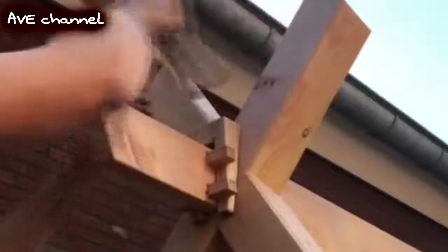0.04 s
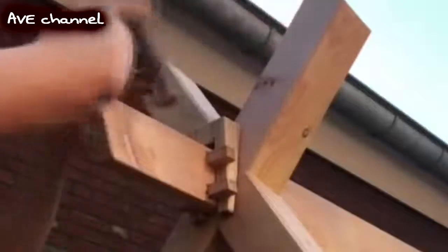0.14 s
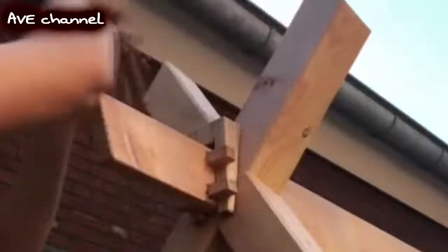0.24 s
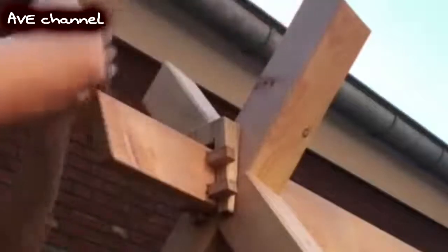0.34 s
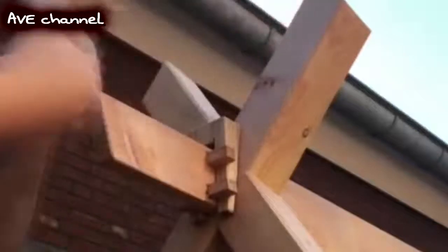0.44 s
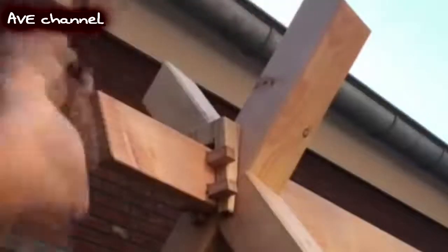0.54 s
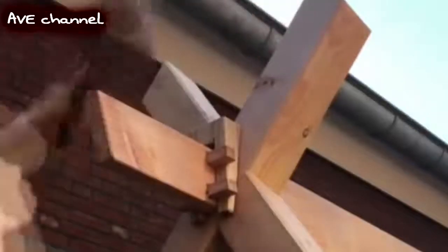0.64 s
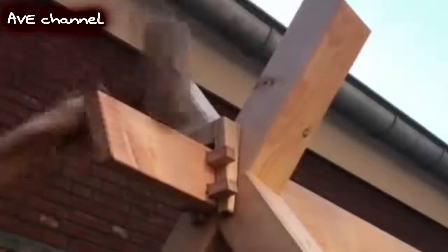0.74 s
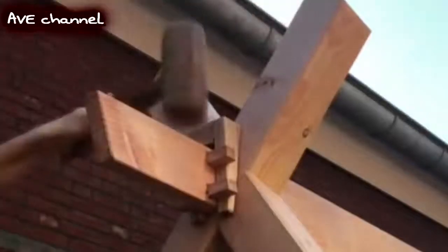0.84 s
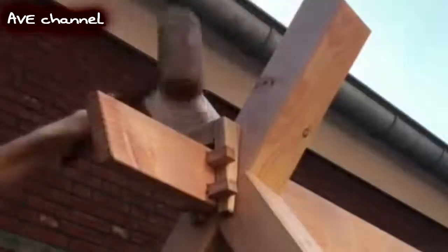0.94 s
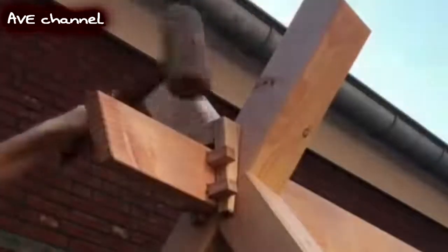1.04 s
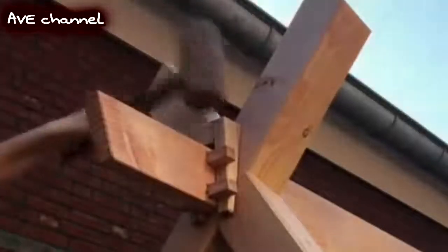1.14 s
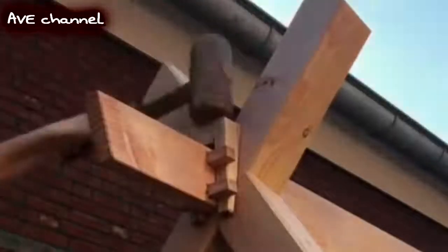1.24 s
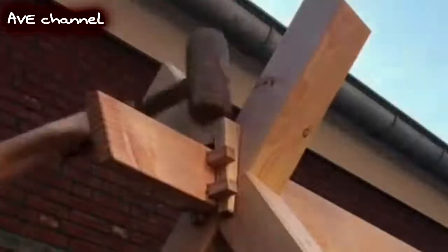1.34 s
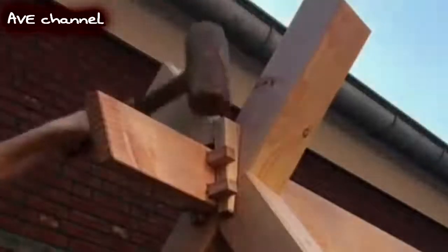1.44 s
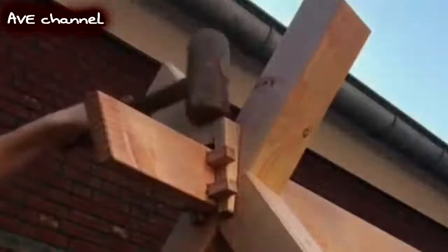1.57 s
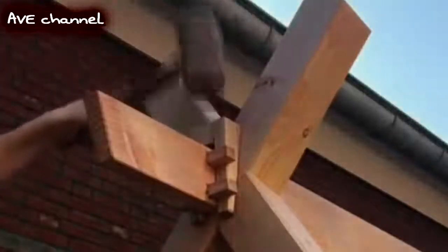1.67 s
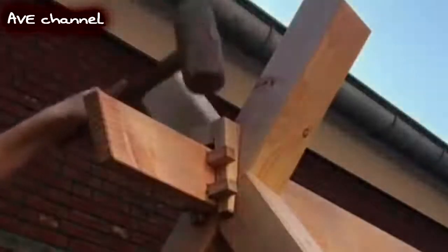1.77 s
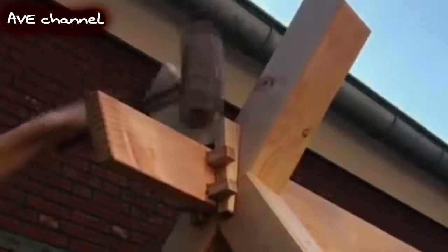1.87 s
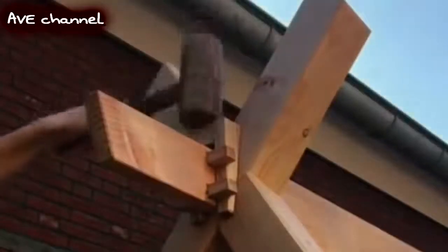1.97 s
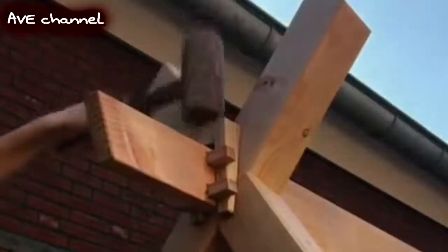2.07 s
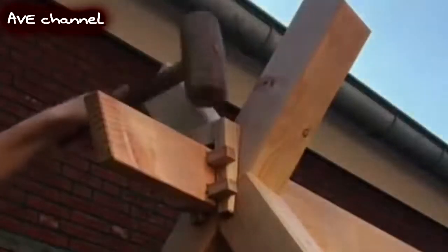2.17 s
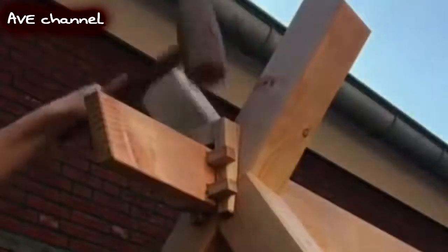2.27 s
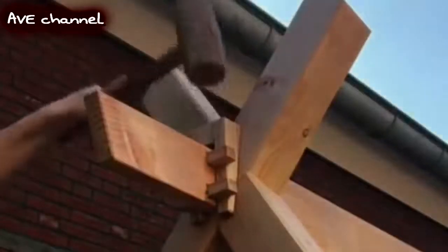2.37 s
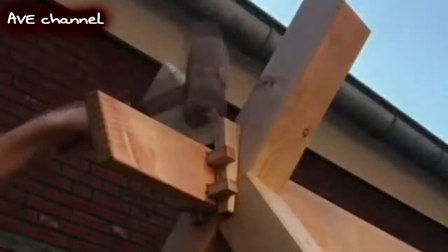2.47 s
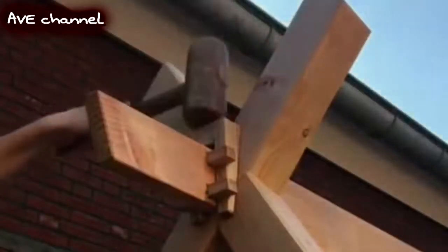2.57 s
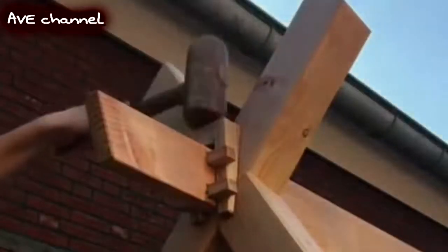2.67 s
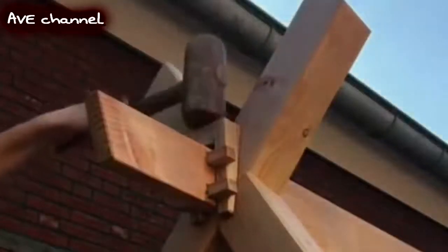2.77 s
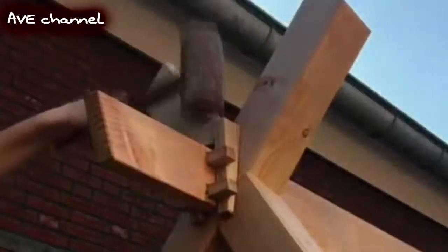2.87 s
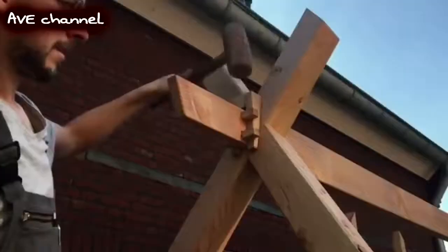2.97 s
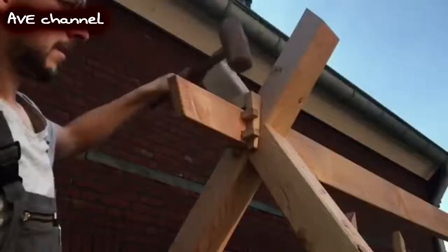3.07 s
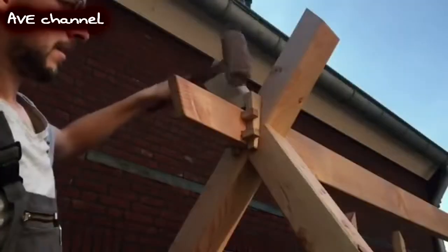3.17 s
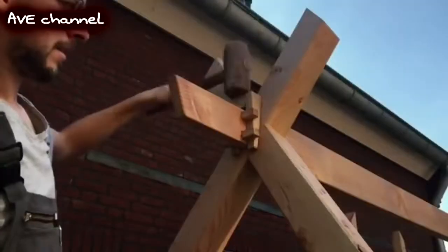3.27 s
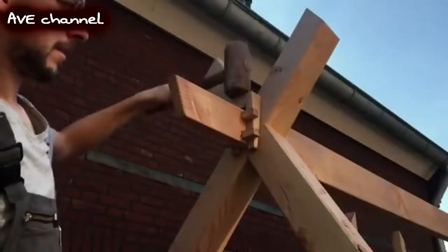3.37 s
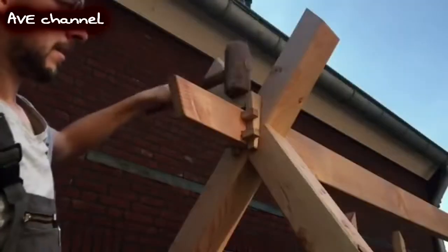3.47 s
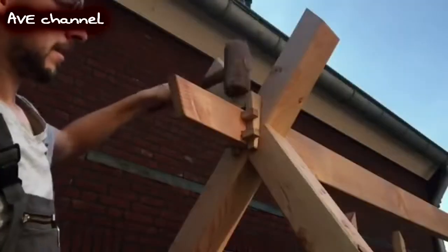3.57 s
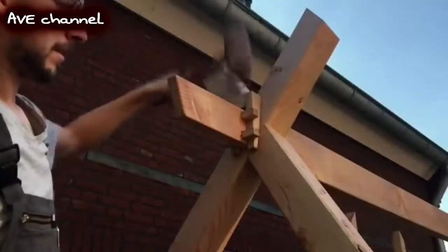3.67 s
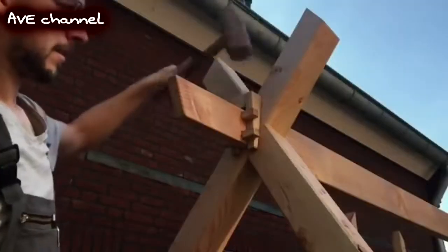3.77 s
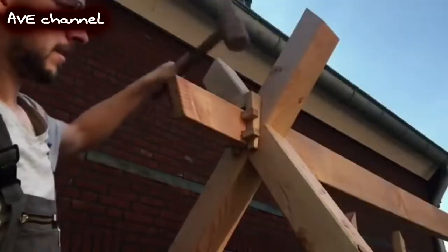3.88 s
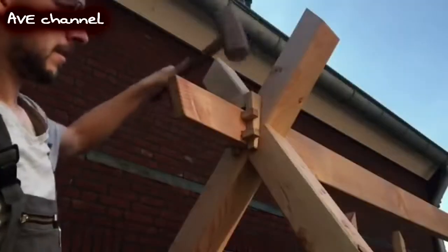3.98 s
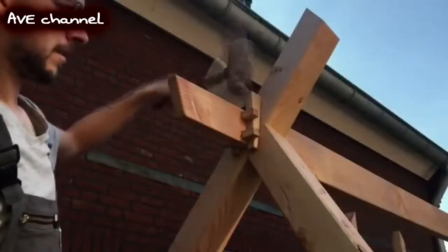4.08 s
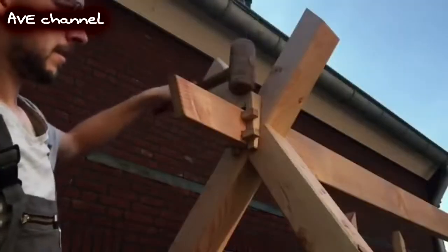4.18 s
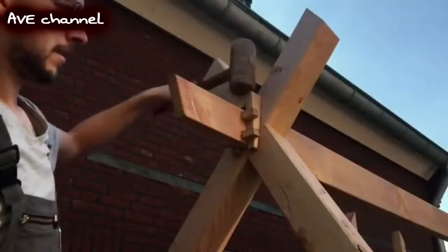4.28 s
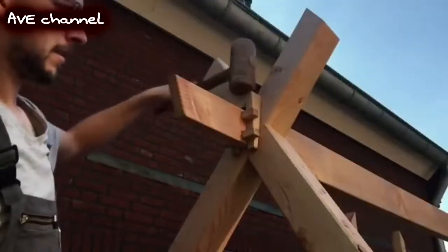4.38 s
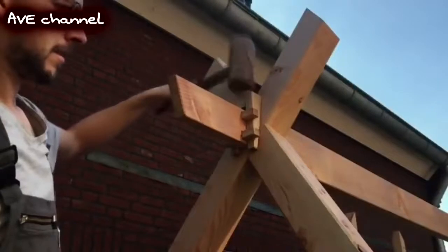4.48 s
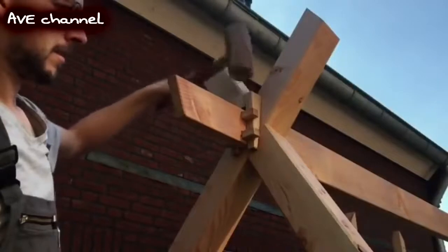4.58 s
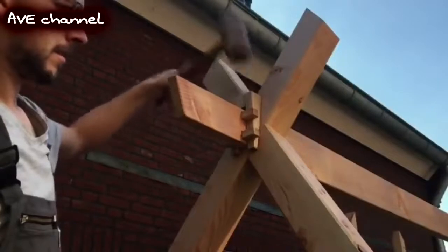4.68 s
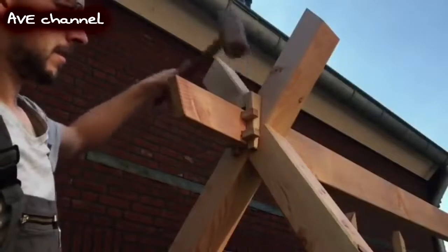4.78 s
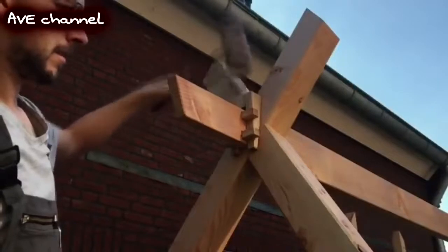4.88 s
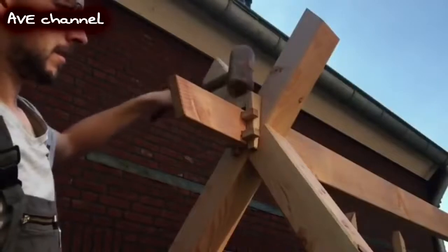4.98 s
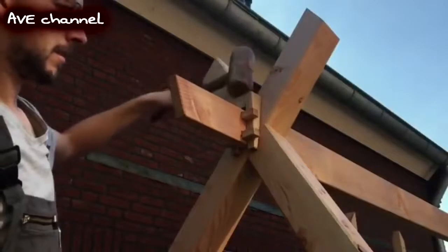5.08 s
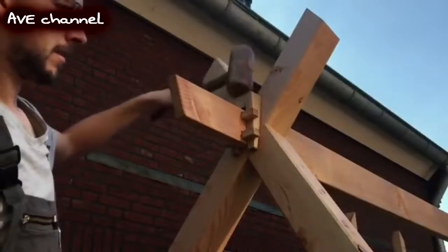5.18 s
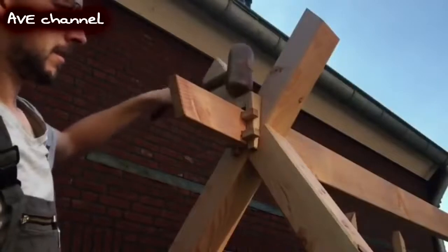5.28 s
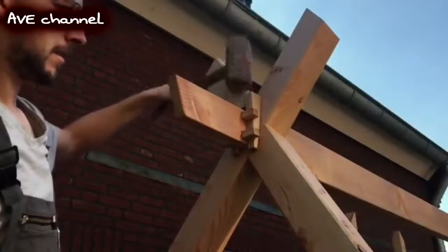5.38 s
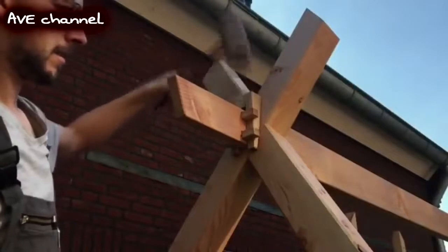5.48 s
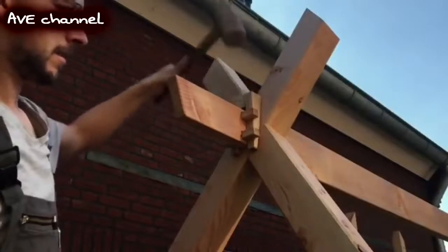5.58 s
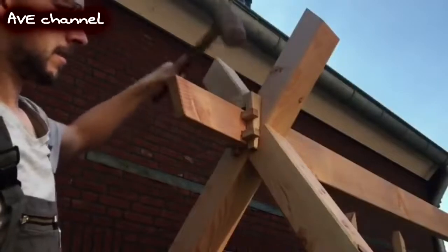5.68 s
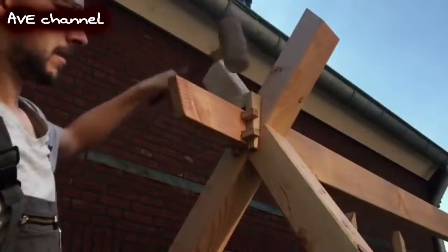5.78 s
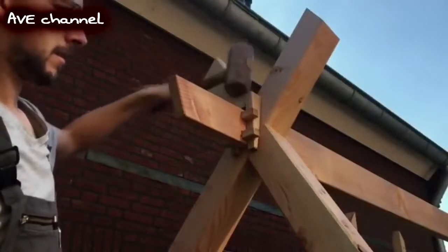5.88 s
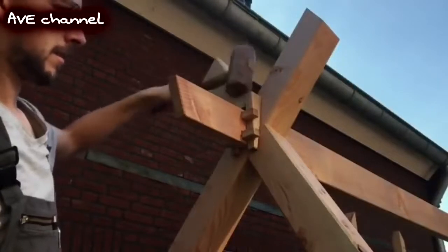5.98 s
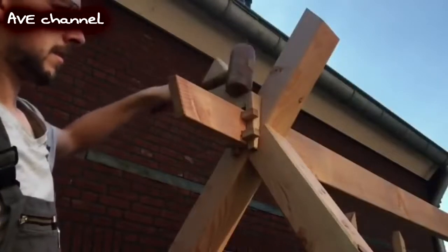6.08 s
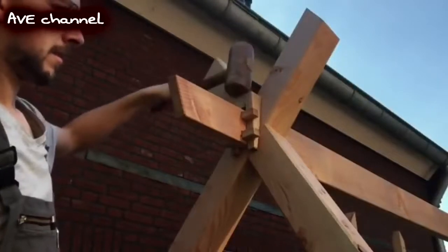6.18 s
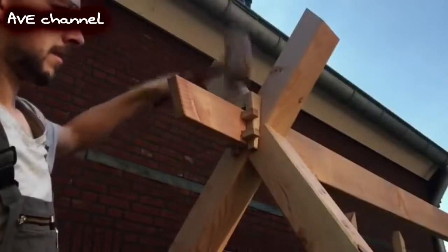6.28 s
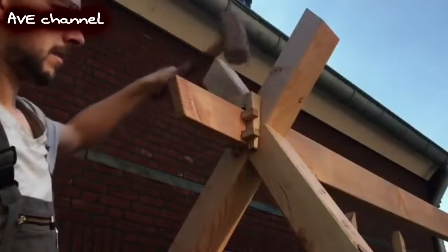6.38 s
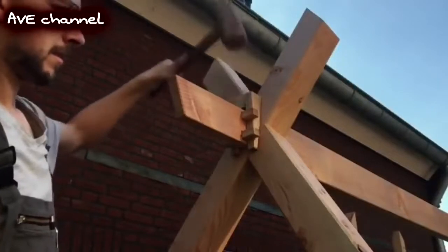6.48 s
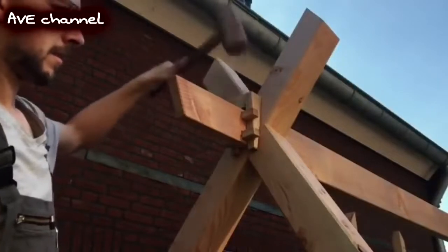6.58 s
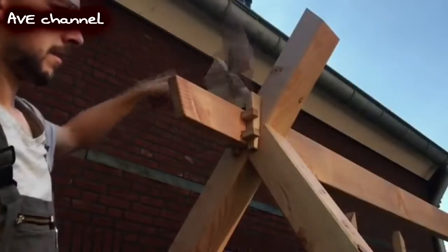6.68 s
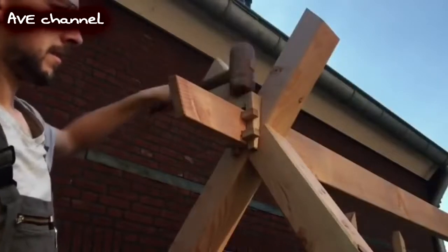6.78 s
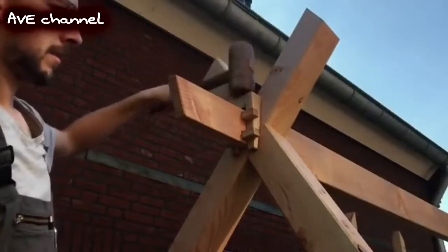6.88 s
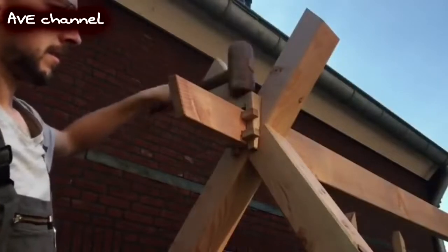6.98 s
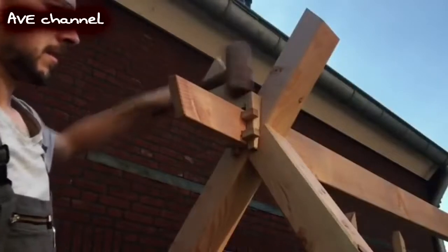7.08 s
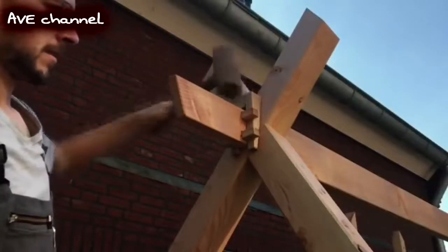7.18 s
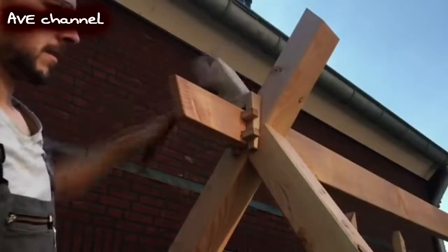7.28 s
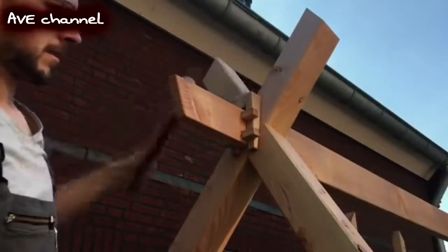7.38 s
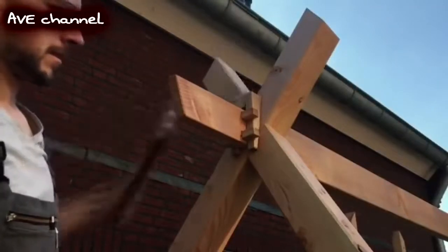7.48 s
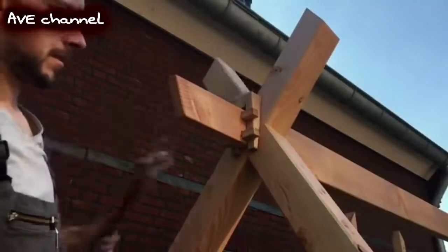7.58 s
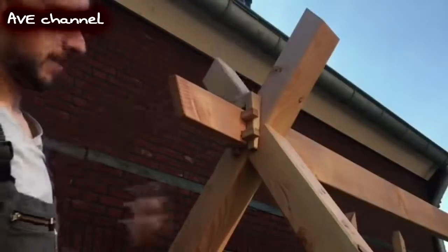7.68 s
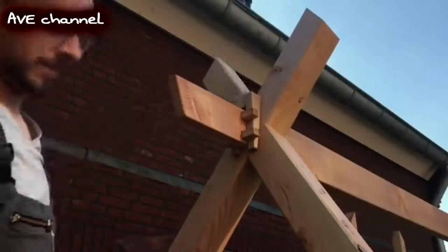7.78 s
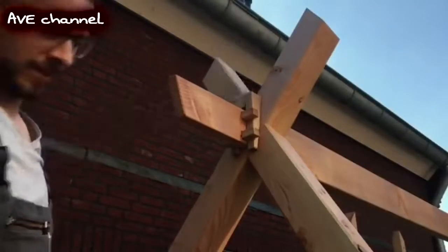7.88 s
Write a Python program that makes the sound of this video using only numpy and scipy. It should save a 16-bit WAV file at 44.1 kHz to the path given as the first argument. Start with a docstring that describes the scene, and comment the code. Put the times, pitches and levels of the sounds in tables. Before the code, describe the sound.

Close, loud wood-on-wood knocks from a heavy mallet seating a brace in a frame. First quiet skin rustles and one dull tap, then four blows in quick uneven succession and five slower ones about every 0.9 seconds, most with a quick little bounce. The peaks are slightly overloaded, with a short yard reverberation. A faint engine hum rises in pitch beneath.

```python
"""A heavy mallet drives a brace into the joint of a timber frame, in a yard beside a brick house.
One soft placing tap, then nine hard blows: as play is used up, the frame booms more and the mallet rebounds.
Wood is decaying modes over shaped noise bursts; a hand brushes it first, and wall echoes and a tail follow.
Behind, a vehicle hums on a climbing pitch, drones briefly, and road noise swells over still air.
"""
import sys
import numpy as np
from scipy import signal
from scipy.fft import rfft, irfft
from scipy.io import wavfile
from scipy.ndimage import uniform_filter1d

SR = 44100
rng = np.random.default_rng(int(sys.argv[2]) if len(sys.argv) > 2 else 0)


def to_wav(s):
    """Save 16-bit WAV."""
    ch = np.atleast_2d(s).T  # columns
    pcm = np.round(np.clip(ch, -1, 1) * 32767)  # PCM
    wavfile.write(sys.argv[1], SR, pcm.astype(np.int16))


N = 349798
AGE = np.arange(SR // 2) / SR  # seconds since a contact
TIME = np.arange(N) / SR
JOINT_LAG_S = 0.00453  # the brace is struck first and knocks in its joint a moment later
BALANCE_DB = 0.77  # left up, right down

PLAY_KEPT = 0.78  # share of the joint's play left after each blow
FRAME_DB, FRAME_LOOSE_DB = -17.5, -18.5  # level without play; change at full play
JOINT_DB, JOINT_LOOSE_DB = -14, -24  # likewise
BRACE_DB, CRACK_DB, EDGE_DB = -16, -20, -41.5  # before each blow's own offsets

# hard mallet blows: start_s, level_db, extra_crack_db, extra_edge_db, contact_pitch_hz
MALLET_BLOWS = [(1.3439, -0.5, -0.5, 0, 1210), (1.6703, -1.5, -8, -7, 1700), (2.0171, 1, -0.5, -6, 1400),
                (2.6214, 1, -4, 0.5, 1653), (3.3619, -1, 2, -1.5, 1590), (4.2261, 0, 0, 1.5, 2280),
                (5.076, 0.5, -1, 1, 1593), (5.9784, 0.5, -1, 1, 1700), (6.851, 1.5, -0.5, 0, 1630)]


def blows():
    """Each blow takes up play: a tighter brace lengthens the grain contact and lets the frame boom more."""
    out = np.zeros(N)
    for k, (start_s, level_db, crack_db, edge_db, contact_pitch_hz) in enumerate(MALLET_BLOWS):
        play = PLAY_KEPT ** k
        rattle_db = -7 + 14 * play
        boom = from_db(FRAME_DB + FRAME_LOOSE_DB * play) * frame_boom(rattle_db)
        knock = from_db(JOINT_DB + JOINT_LOOSE_DB * play) * joint_knock(rattle_db)
        clack = brace_clack(contact_pitch_hz, tone_db=-4 + 5 * play, dense_db=7.5 - 2.6 * play, contact_s=0.003)
        grain = crack(contact_s=0.0066 * 0.35 ** play, ring_db=2.5 - 15 * play, ring_t60_s=0.063)
        edge = bright_edge(fizz_db=-1 - 7.6 * play)
        struck = boom + from_db(BRACE_DB) * clack
        struck += from_db(CRACK_DB + crack_db) * grain
        struck += from_db(EDGE_DB + edge_db) * edge
        add(out, start_s, from_db(level_db) * struck)
        add(out, start_s + JOINT_LAG_S, from_db(level_db) * knock)
    return out


# clear modes of the frame: pitch_hz, level_db, t60_s
FRAME_MODES = [(255, -17, .12), (311, -10, .24), (322, -3, .075), (395, -9, .07), (434, -2, .08),
               (462, -7, .08), (508, 0, .11)]
# dense modes of the frame: freq_hz, level_db_per_hz
THUD_SPECTRUM = [(40, -25.5), (80, -9.5), (120, -6), (165, -6), (200, -18.5), (240, -5), (330, -1.5),
                 (520, -4.5), (700, -12.5), (1200, -44.5)]


def frame_boom(dense_db):
    """Low bending of posts and beams."""
    boom = timber(FRAME_MODES, THUD_SPECTRUM, dense_db, dense_t60_s=0.14, spread_db=5.5)
    return unit_blow(boom * build_up(0.0036))


# clear modes of the seated joint: pitch_hz, level_db, t60_s
JOINT_MODES = [(578, -10, .07), (622, -9, .08), (682, -7, .07), (716, 0, .12), (745, -9, .08),
               (785, -6, .1), (832, -9, .09)]
# dense modes of the joint: freq_hz, level_db_per_hz
KNOCK_SPECTRUM = [(350, -49.5), (560, -7.5), (730, 9.5), (850, -7), (950, -15.5), (1500, -41)]


def joint_knock(dense_db):
    """The hollow note of the tight joint."""
    knock = timber(JOINT_MODES, KNOCK_SPECTRUM, dense_db, dense_t60_s=0.14, spread_db=0.5)
    return unit_blow(knock * build_up(0.0015))


# clear modes of the brace: pitch_hz, level_db, t60_s
BRACE_MODES = [(980, -10, .06), (1070, -8, .06), (1194, -2, .11), (1275, -7, .05), (1356, -1, .08),
               (1420, -6, .07), (1520, -4, .05), (1582, -1, .07), (1725, -4, .06), (1860, -7, .04),
               (1950, -6, .04)]
# dense modes of the brace: freq_hz, level_db_per_hz
CLACK_SPECTRUM = [(550, -29), (900, -5.5), (1200, 3.5), (1600, 0.5), (2000, -1), (2500, -12), (4000, -44.5)]


def brace_clack(contact_pitch_hz, tone_db, dense_db, contact_s):
    """The contact sounds a few strong cycles; the brace rings on, most in the modes near that pitch."""
    tone = unit_blow(np.sin(2 * np.pi * contact_pitch_hz * AGE) * contact(contact_s))
    # 16 dB off per octave from the contact's pitch
    modes = [(hz, db - 16 * abs(np.log2(hz / contact_pitch_hz)), t60_s) for hz, db, t60_s in BRACE_MODES]
    ring = timber(modes, CLACK_SPECTRUM, dense_db, dense_t60_s=0.089, spread_db=0.5)
    return unit_blow(from_db(tone_db) * tone + ring * build_up(0.0011))


# struck end grain: freq_hz, level_db_per_hz
CRACK_SPECTRUM = [(1400, -32), (2000, -0.5), (2350, 0.5), (2750, -0.5), (3250, -4.5), (3800, -9.5),
                  (4450, -12), (5000, -19), (8000, -30)]


def crack(contact_s, ring_db, ring_t60_s):
    """End grain cracks during the contact, rings briefly and spreads faintly through the frame."""
    grain = unit_blow(noise(CRACK_SPECTRUM, len(AGE)) * contact(contact_s))
    ring = burst(CRACK_SPECTRUM, ring_t60_s)
    spread = from_db(-5.5) * burst(CRACK_SPECTRUM, t60_s=0.31)
    return unit_blow(grain + from_db(ring_db) * (ring + spread) * build_up(0.003))


# bright overload edge and fizz: freq_hz, level_db_per_hz
EDGE_SPECTRUM = [(3000, -9), (5000, -8), (5600, 2), (7500, -5.5), (9300, -1.5), (10400, -13.5), (12000, -5),
                 (13300, -12.5), (14200, -20), (16000, -26.5)]


def bright_edge(fizz_db):
    """The bright overload edge of a blow, a noise pulse of 2.3 ms, and a short fizz."""
    edge = unit_blow(noise(EDGE_SPECTRUM, len(AGE)) * contact(0.0023))
    fizz = burst(EDGE_SPECTRUM, t60_s=0.11) * build_up(0.001)
    return unit_blow(edge + from_db(fizz_db) * fizz)


REBOUND_TICK_DB, REBOUND_CLACK_DB = -29.5, -14
REBOUND_BOOM_DB, REBOUND_KNOCK_DB = -20.5, -12

# mallet dropping back on the brace: start_s, level_db, contact_hardness_db
MALLET_REBOUNDS = [(3.407, -15, 3.5), (4.295, -13.5, 1.5), (4.333, -19.5, -2.5), (5.145, -14, -1),
                   (6.056, -14.5, -3), (6.936, -10.5, -1), (6.982, -16, -1), (7.009, -23, 3)]


def rebounds():
    """The falling head ticks and clacks on the brace, which then knocks dully in its joint."""
    out = np.zeros(N)
    for start_s, level_db, hardness_db in MALLET_REBOUNDS:
        tick = from_db(REBOUND_TICK_DB) * crack(contact_s=0.0035, ring_db=-6, ring_t60_s=0.044)
        clack = brace_clack(contact_pitch_hz=1186, tone_db=-0.5, dense_db=-0.5, contact_s=0.0026)
        hard = tick + from_db(REBOUND_CLACK_DB) * clack
        boom = from_db(REBOUND_BOOM_DB) * frame_boom(dense_db=6)
        knock = from_db(REBOUND_KNOCK_DB) * joint_knock(dense_db=-0.5)
        add(out, start_s, from_db(level_db) * (from_db(hardness_db) * hard + boom))
        add(out, start_s + JOINT_LAG_S, from_db(level_db) * knock)
    return out


# soft placing tap: freq_hz, level_db_per_hz
TAP_SPECTRUM = [(120, -28), (180, -5), (230, 2), (340, 1), (420, -1), (520, -8.5), (720, -1), (900, -21),
                (1150, -17), (2500, -30.5)]


def placing_tap(start_s, level_db):
    """The head is set down gently: a dull thud with a faint tick."""
    out = np.zeros(N)
    thud = burst(TAP_SPECTRUM, t60_s=0.065) * build_up(0.001)
    tick = from_db(-25) * crack(contact_s=0.0026, ring_db=-12, ring_t60_s=0.04)
    tick += from_db(-35.5) * bright_edge(fizz_db=-6)
    add(out, start_s, from_db(level_db) * (thud + tick))
    return out


# hand strokes over the timber: start_s, length_s, level_db
HAND_BRUSHES = [(0.274, 0.29, -76.5), (0.543, 0.24, -73)]
# skin on planed wood: freq_hz, level_db_per_hz
BRUSH_SPECTRUM = [(900, 0), (2400, -4), (4000, 2), (6000, -7), (9000, 0.5), (13500, -10)]


def brushes():
    """Skin slides on planed wood in short soft strokes as the hand takes hold."""
    out = np.zeros(N)
    for start_s, length_s, level_db in HAND_BRUSHES:
        add(out, start_s, from_db(level_db) * noise(BRUSH_SPECTRUM, len(AGE)) * contact(length_s))
    return out


def timber(modes, spectrum, dense_db, dense_t60_s, spread_db):
    """Clear modes of alternating sign, struck a little differently each time, over a bed of dense ones."""
    pitch_hz, level_db, t60_s = np.transpose(modes)[:, :, None]
    strength = from_db(level_db + spread_db * rng.standard_normal(pitch_hz.shape))
    strength[::2] *= -1
    clear = np.sum(strength * dying(t60_s) * np.sin(2 * np.pi * pitch_hz * AGE), axis=0)
    dense = from_db(dense_db) * burst(spectrum, dense_t60_s)
    return unit_blow(unit_blow(clear) + dense)


def burst(spectrum, t60_s):
    """Many close modes, heard as a dying noise."""
    return unit_blow(noise(spectrum, len(AGE)) * dying(t60_s))


def contact(length_s):
    """The force swells and fades while two surfaces touch."""
    return np.sin(np.pi * np.minimum(AGE / length_s, 1)) ** 0.7


def build_up(time_constant_s):
    """Sound takes time to spread: exponential onset."""
    return 1 - np.exp(-AGE / time_constant_s)


def dying(t60_s):
    """Exponential decay after a contact, 60 dB per t60."""
    return from_db(-60 * AGE / t60_s)


# first scatter: freq_hz, level_db_per_hz
YARD_SPECTRUM = [(60, -13), (200, -4), (320, 4), (750, 1.5), (1200, 3), (2000, -8), (3000, -16.5),
                 (4500, -27)]
# duller late tail: freq_hz, level_db_per_hz
LATE_SPECTRUM = [(100, -6), (320, 6.5), (750, 0), (1300, -6), (2200, -12.5), (3200, -23.5)]
# walls and eaves: delay_s, level_db
WALL_ECHOES = [(.0063, -29), (.013, -20), (0.051, -29)]


def yard(x, tail_db, t60_s, late_db, late_t60_s):
    """Echoes from nearby walls, a short scattered tail and a faint longer one that has lost its treble."""
    early = noise(YARD_SPECTRUM, len(AGE)) * dying(t60_s) * build_up(0.0091)
    late = noise(LATE_SPECTRUM, len(AGE)) * dying(late_t60_s) * build_up(0.021)
    response = from_db(tail_db) * early / np.sqrt(np.sum(early ** 2))
    response += from_db(late_db) * late / np.sqrt(np.sum(late ** 2))
    for delay_s, level_db in WALL_ECHOES:
        response[round(delay_s * SR)] += from_db(level_db)
    return x + signal.fftconvolve(x, response)[:N]


ENGINE_HZ, ENGINE_CLIMB_HZ_PER_S = 65.5, 5.4  # firing rate as the hum sets in; steady climb

# engine hum level: time_s, level_db
HUM_LEVEL = [(3.7, -67), (3.93, -43.5), (5.8, -44), (6.24, -57), (6.41, -41.5), (6.89, -47), (7.08, -82),
             (7.22, -52), (7.73, -41), (7.93, -47.5)]


def engine(overtone_db, waver_db):
    """A low firing note and its octave climb steadily while the level wavers."""
    time_s, level_db = np.transpose(HUM_LEVEL)
    since_onset_s = TIME - time_s[0]
    hz = ENGINE_HZ + ENGINE_CLIMB_HZ_PER_S * since_onset_s
    phase = 2 * np.pi * np.cumsum(hz) / SR
    hum = np.sqrt(2) * (np.sin(phase) + from_db(overtone_db) * np.sin(2 * phase))
    waver = waver_db * noise([(2, 0), (14, -6)], N)
    fade_in_db = 30 * np.minimum(since_onset_s, 0)
    return from_db(np.interp(TIME, time_s, level_db) + waver + fade_in_db) * hum


ROAD_FAR_DB, TYRES_DB, TYRE_WAVER_DB = -67, -46, 0.56  # distant roads; tyres at peak; rms waver
TYRES_PEAK_S, TYRES_RISE_DB_PER_S, TYRES_FALL_DB_PER_S = 6.12, 7.5, 0.8

# road noise: freq_hz, level_db_per_hz
ROAD_SPECTRUM = [(110, -0.5), (165, 4.5), (200, -2.5), (228, 3.5), (350, -4.5), (750, -0.5), (1150, 0.5),
                 (2000, -5.5), (2750, -13.5), (3250, -13), (5000, -24), (6000, -23), (6750, -22.5),
                 (7500, -30), (9000, -32), (13500, -50)]


def road():
    """Wavering tyre noise swells over a steady floor of distant roads."""
    waver = from_db(TYRE_WAVER_DB * noise([(1, 0), (10, -7)], N))
    rise_and_fall = swell(TYRES_PEAK_S, TYRES_RISE_DB_PER_S, TYRES_FALL_DB_PER_S)
    tyres = from_db(TYRES_DB) * waver * rise_and_fall
    return np.hypot(from_db(ROAD_FAR_DB), tyres) * noise(ROAD_SPECTRUM, N)


# vehicle drones: freq_hz, level_db_per_hz
DRONE_SPECTRUM = [(145, -40), (164, -3.5), (185, -21.5), (210, -34), (226, -1.5), (250, -32)]


def drone():
    """Two narrow low drones of the vehicle, bands of noise at fixed pitch, swell for a moment."""
    rise_and_fall = swell(peak_s=6.7, rise_db_per_s=25, fall_db_per_s=18)
    return from_db(-47.5) * rise_and_fall * noise(DRONE_SPECTRUM, N)


def swell(peak_s, rise_db_per_s, fall_db_per_s):
    """Gain that climbs to 1 and sinks again."""
    return from_db(np.minimum(rise_db_per_s * (TIME - peak_s), fall_db_per_s * (peak_s - TIME)))


# still outdoor air: freq_hz, level_db_per_hz
AIR_SPECTRUM = [(20, -16.5), (45, -0.5), (100, 0.5), (170, -10), (260, -16.5), (400, -22), (1100, -25),
                (2000, -32.5), (3000, -45), (5000, -49), (9000, -52), (13500, -54.5)]


def air(level_db):
    """Still outdoor air: steady, mostly low noise."""
    return from_db(level_db) * noise(AIR_SPECTRUM, N)


# microphone hiss: freq_hz, level_db_per_hz
HISS_SPECTRUM = [(2000, 7), (3500, -2), (6000, -6.5), (10000, -9), (13800, -13)]


def gated_hiss(sound, hiss_db, hold_s):
    """A noise gate blocks the microphone hiss; every loud peak on the left holds it open for a while."""
    loud = np.abs(sound[0]) > 0.3
    last_loud_s = np.maximum.accumulate(np.where(loud, TIME, -np.inf))
    held = (TIME - last_loud_s < hold_s).astype(float)
    opened = uniform_filter1d(held, size=300)
    return opened * from_db(hiss_db) * noise(HISS_SPECTRUM, N)


def noise(spectrum, size):
    """Noise of a given colour, interpolated over log frequency, rms 1."""
    freq_hz, level_db = np.transpose(spectrum)
    bins_hz = np.maximum(np.fft.rfftfreq(size, 1 / SR), 1)
    gain = from_db(np.interp(np.log(bins_hz), np.log(freq_hz), level_db, left=-90, right=-90))
    return rms_one(irfft(rfft(rng.standard_normal(size)) * gain, size))


def from_db(db):
    """Decibels to gain."""
    return 10 ** (np.asarray(db) / 20)


def rms_one(x):
    """Scale to rms 1."""
    return x / np.sqrt(np.mean(x ** 2) + 1e-20)


def unit_blow(x):
    """Scale to the energy of 20 ms at rms 1."""
    return x / np.sqrt(np.sum(x ** 2) / (0.02 * SR) + 1e-20)


def add(track, start_s, sound):
    """Mix a sound in at a time."""
    at = round(start_s * SR)
    track[at:at + len(sound)] += sound[:N - at]


def scene():
    """Wood in the yard, then the background; all a little stronger on the left."""
    wood = blows() + rebounds() + placing_tap(start_s=0.8865, level_db=-29) + brushes()
    knocks = yard(wood, tail_db=-19, t60_s=0.21, late_db=-22.5, late_t60_s=0.43)
    vehicle = engine(overtone_db=-17, waver_db=1.7) + road() + drone()
    return (knocks + vehicle + air(level_db=-50.8)) * from_db([[BALANCE_DB], [-BALANCE_DB]])


def record(dry):
    """Hiss follows the loud knocks, the loudest peaks overload, and the top is cut."""
    heard = dry + gated_hiss(dry, hiss_db=-66, hold_s=0.392)
    ceiling = 1.02 * from_db([[0], [-2 * BALANCE_DB]])  # left, right
    rounded = heard / (1 + (heard / ceiling) ** 8) ** 0.125
    top_cut = signal.cheby2(12, 70, 16984, fs=SR, output="sos")  # 70 dB down from 16984 Hz
    return signal.sosfilt(top_cut, rounded)


dry = scene()
out = record(dry)
to_wav(out)
```